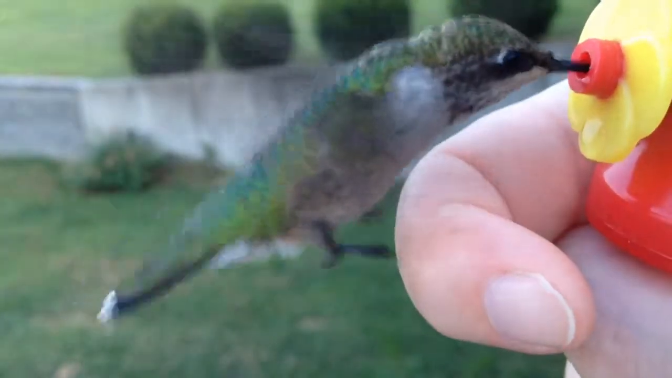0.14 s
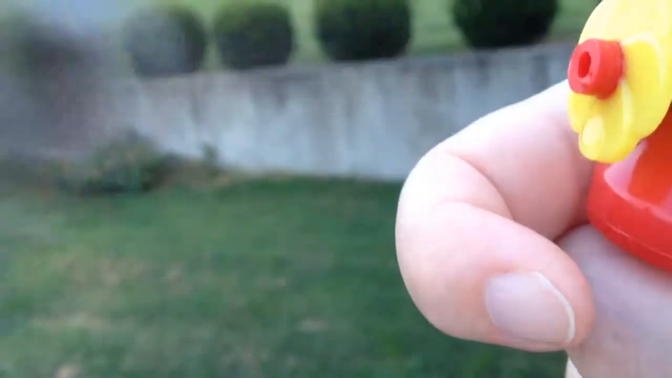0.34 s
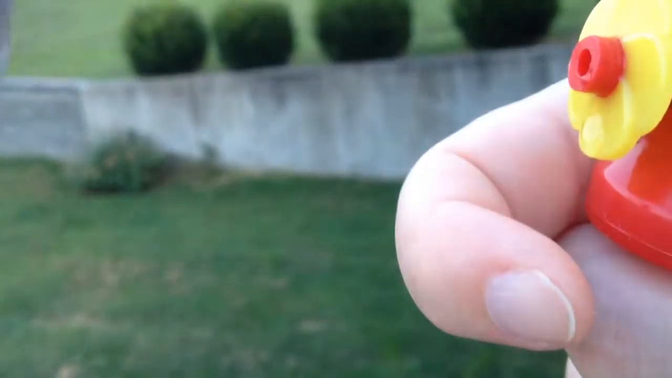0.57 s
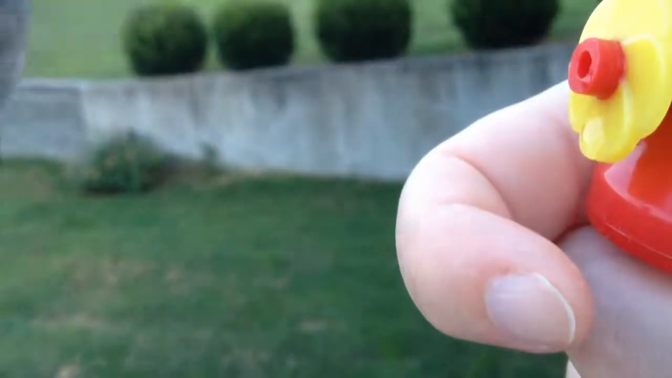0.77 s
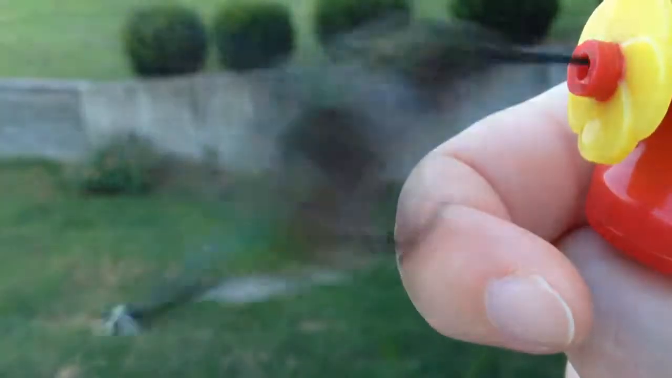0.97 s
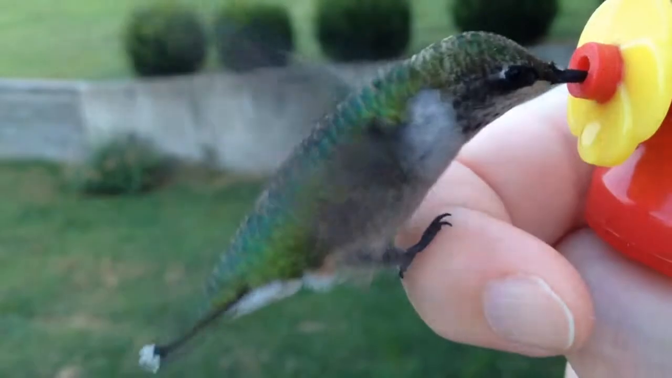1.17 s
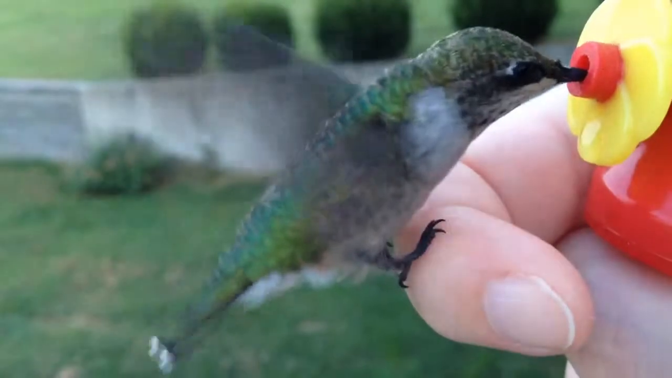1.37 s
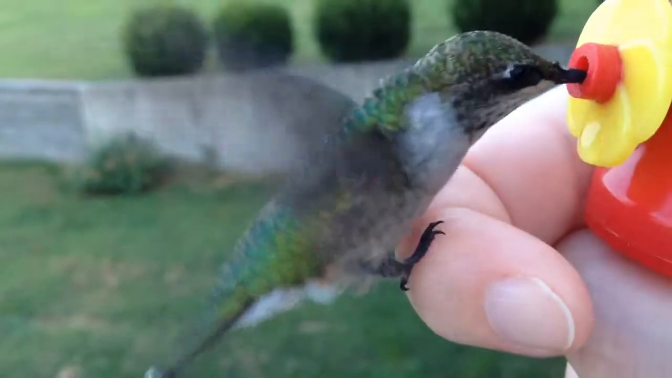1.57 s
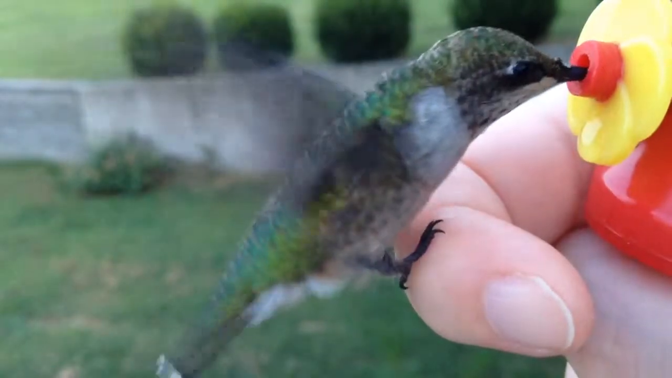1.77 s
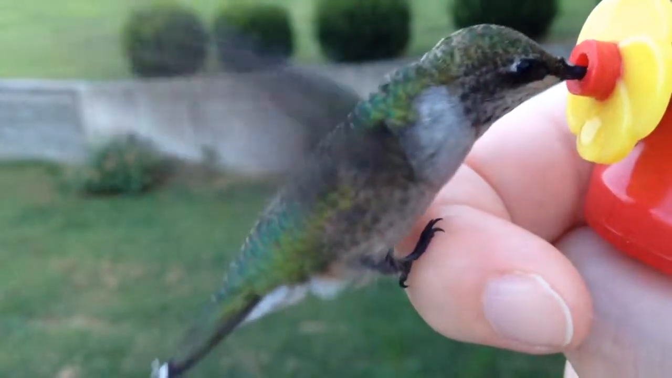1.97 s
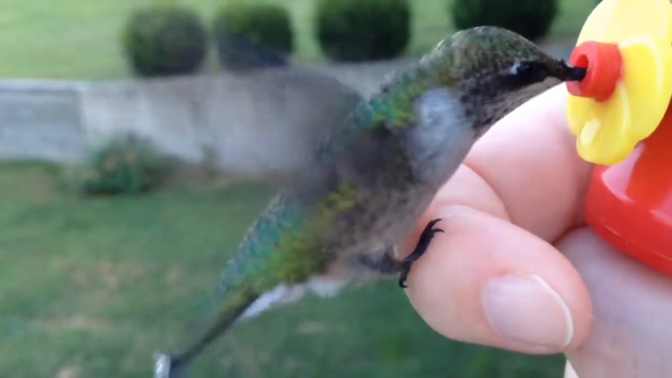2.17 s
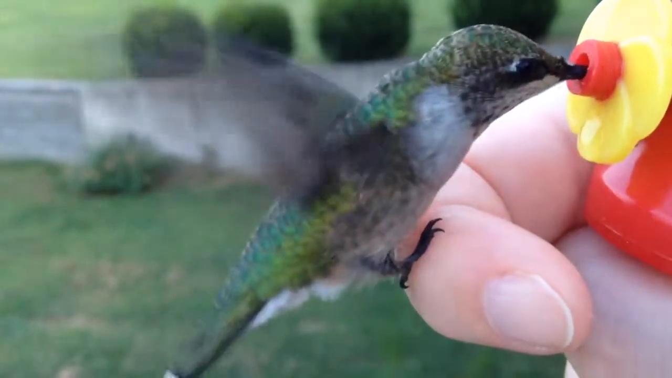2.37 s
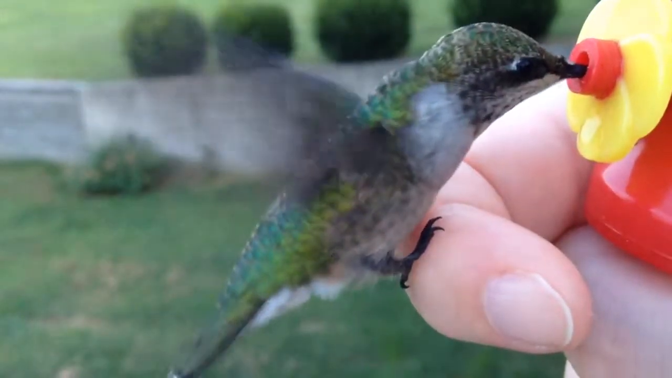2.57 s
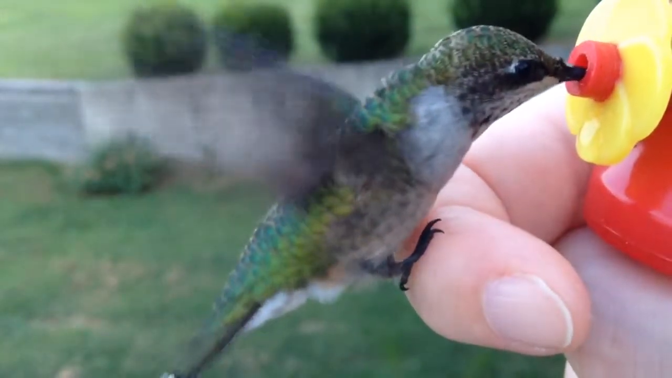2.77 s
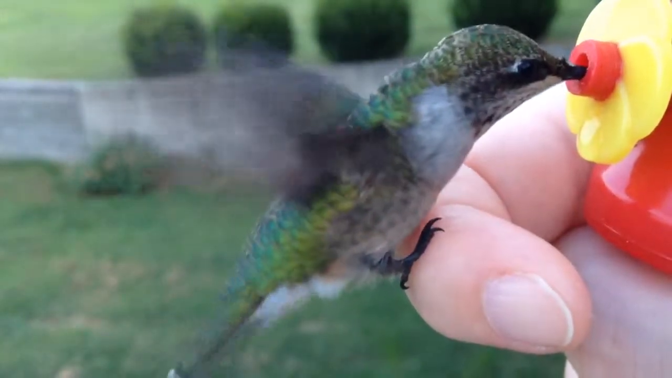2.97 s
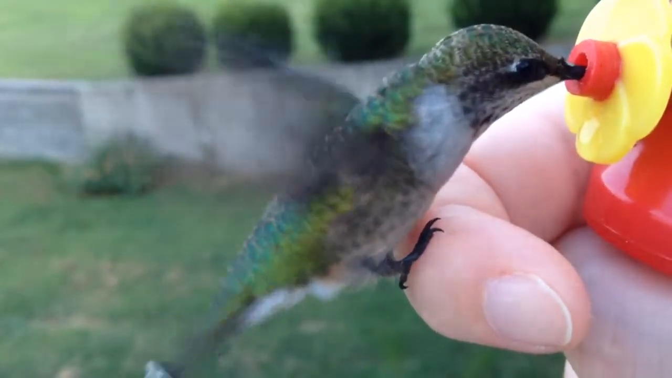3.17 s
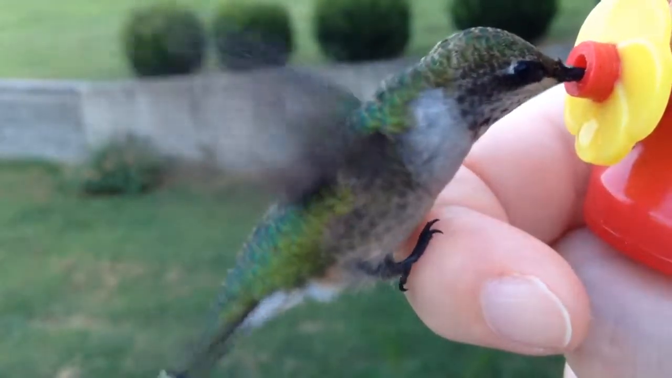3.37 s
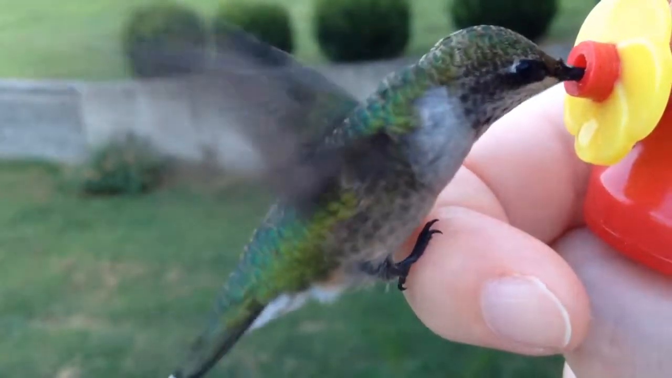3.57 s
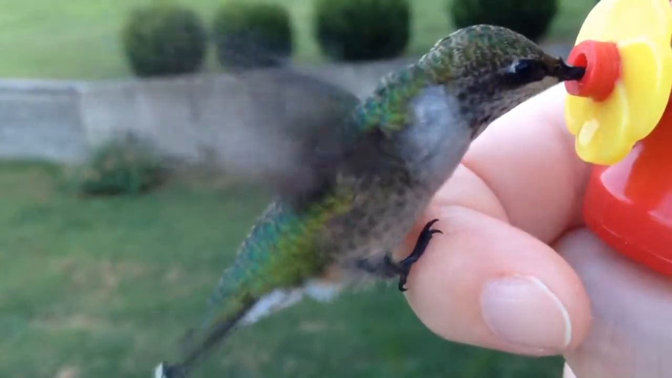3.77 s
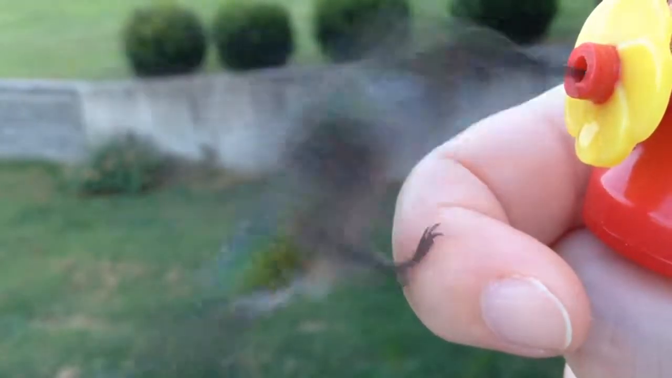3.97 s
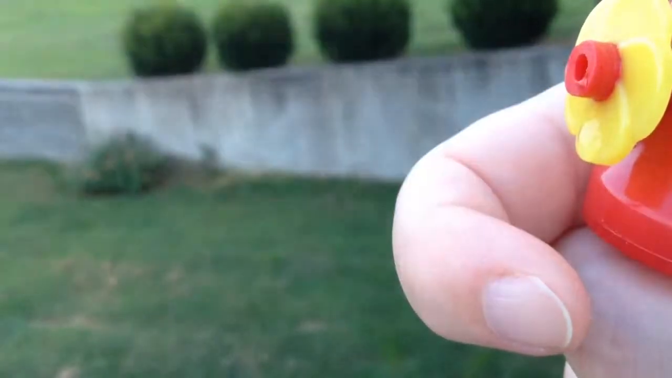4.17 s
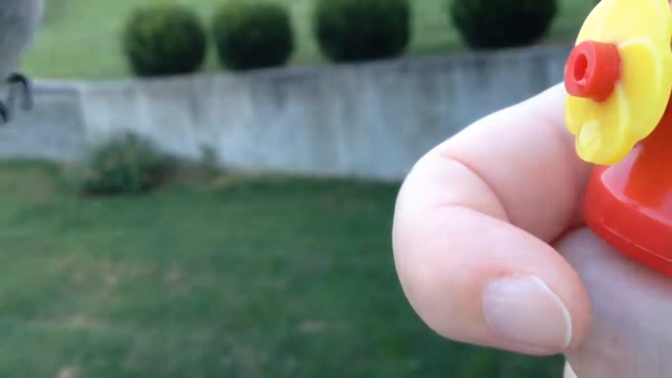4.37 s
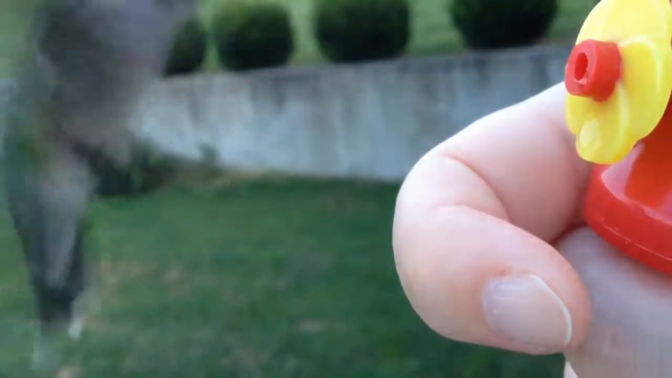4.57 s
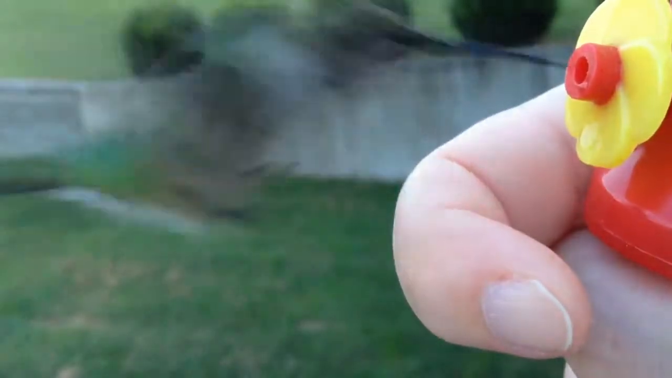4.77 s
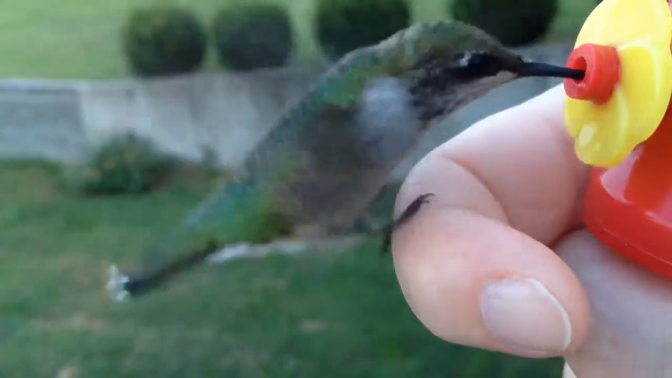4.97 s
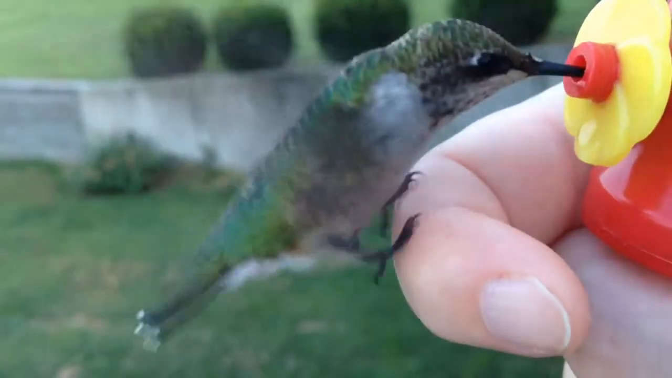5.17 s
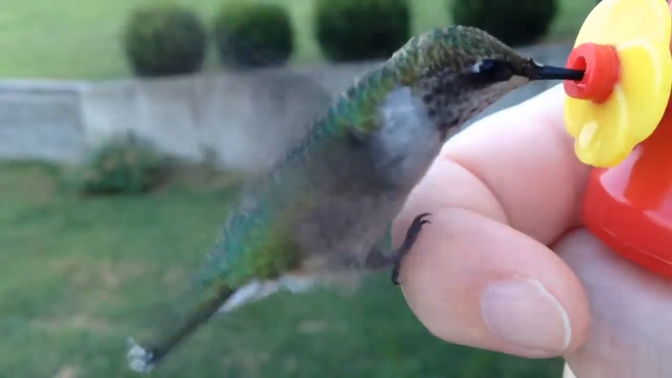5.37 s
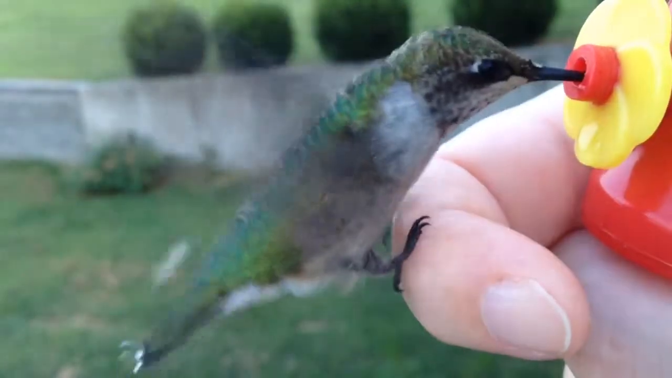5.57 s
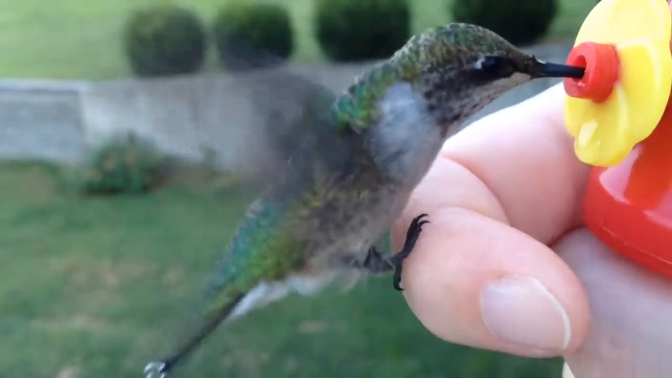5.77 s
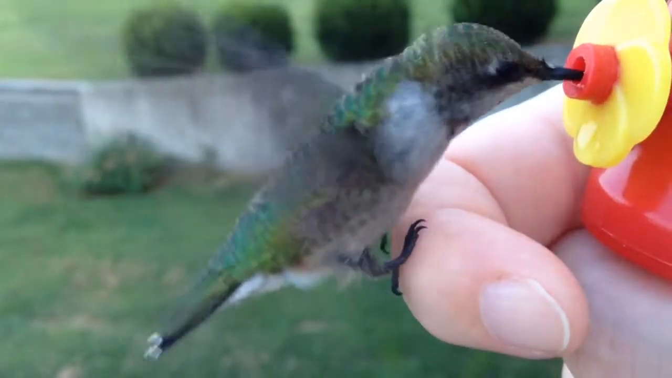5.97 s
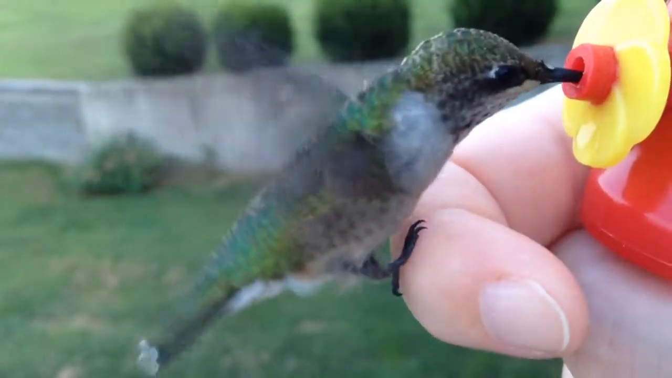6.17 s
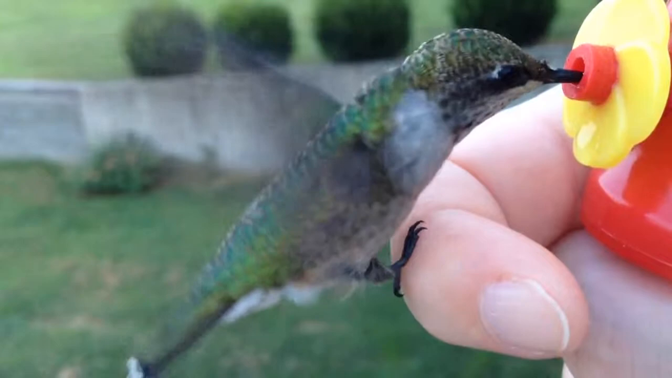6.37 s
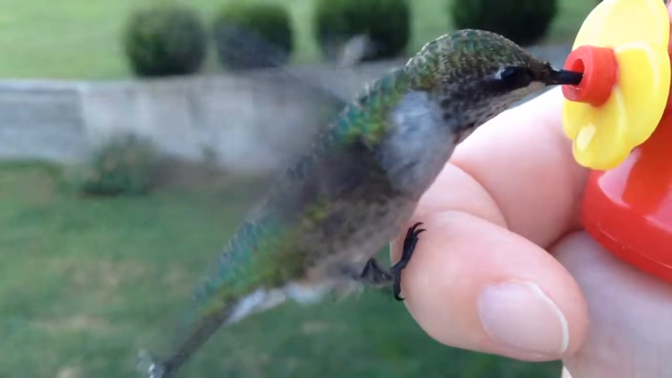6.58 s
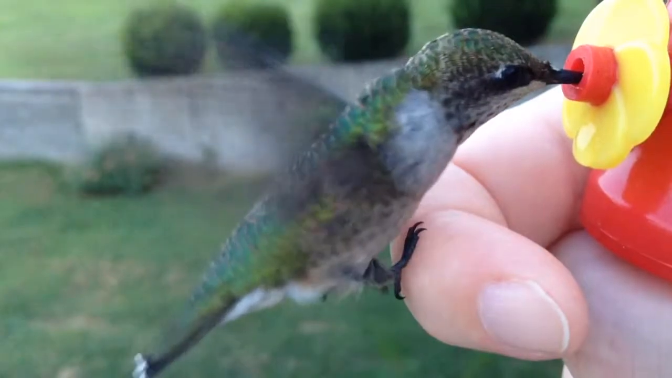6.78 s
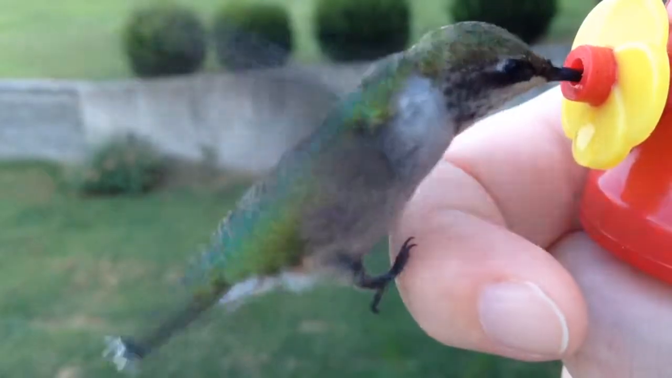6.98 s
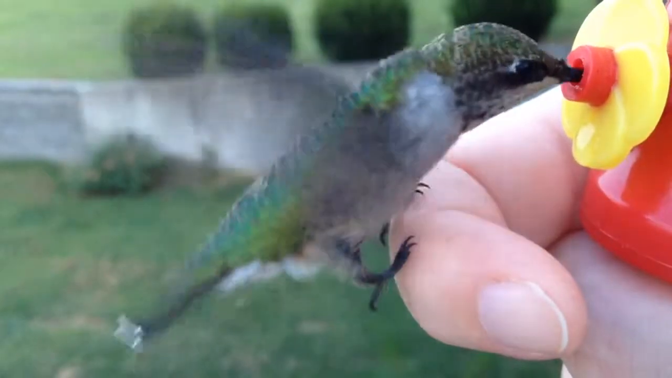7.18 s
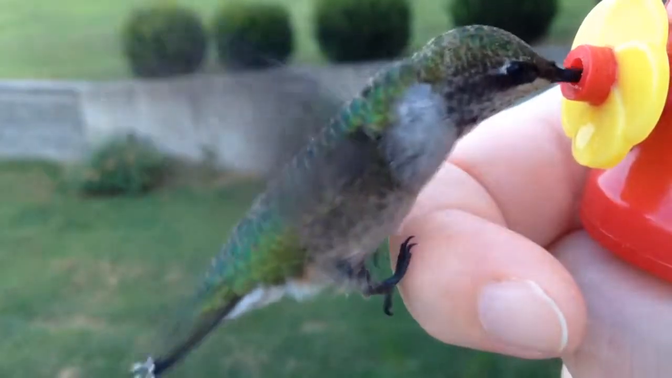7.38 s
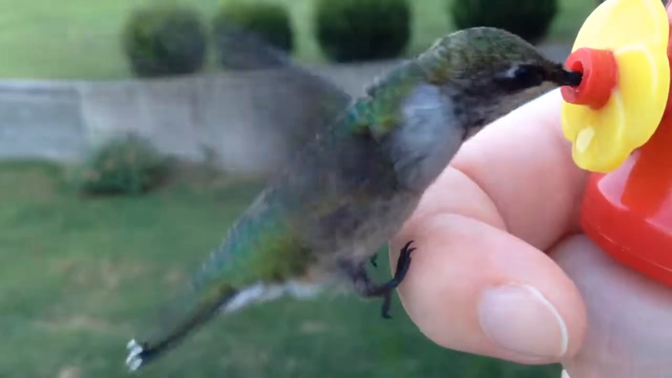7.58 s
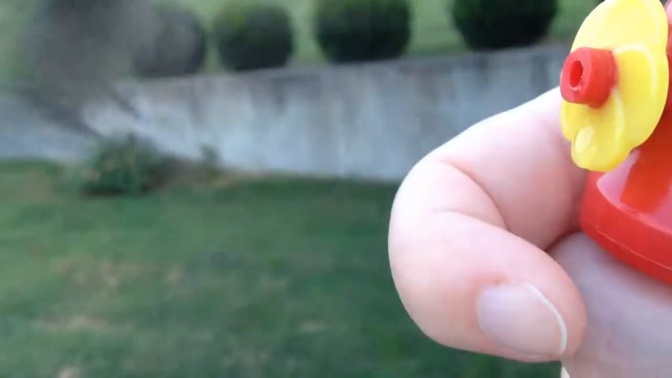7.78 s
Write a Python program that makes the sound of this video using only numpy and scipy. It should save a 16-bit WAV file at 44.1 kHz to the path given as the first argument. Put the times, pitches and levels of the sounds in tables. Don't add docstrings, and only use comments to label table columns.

```python
import sys
import numpy as np
from scipy import signal
from scipy.fft import rfft, irfft
from scipy.io import wavfile
from scipy.ndimage import uniform_filter1d

SR = 44100
rng = np.random.default_rng(int(sys.argv[2]) if len(sys.argv) > 2 else 0)


def pcm_store(signal):
    levels = np.round(np.clip(np.atleast_2d(signal), -1, 1) * 32767)
    wavfile.write(sys.argv[1], SR, levels.astype(np.int16).T)


def volts_from_db(level):
    exponent = np.asarray(level, float) / 20
    return 10 ** exponent


N = 345744
TIME_S = np.arange(N) / SR
HOVER_DB, HOVER_HZ = -66, 47.55


def rms_one(x):
    return x / np.sqrt(np.mean(x ** 2) + 1e-20)


def at_hz(points, hz):
    point_hz, point_db = np.transpose(points)
    return np.interp(np.log(hz), np.log(point_hz), point_db)


def drift(rate_hz):
    step = 40
    pole = np.exp(-2 * step * np.pi * rate_hz / SR)
    noise = rng.standard_normal(N // step + 2002)
    slow = signal.lfilter([1], [1, -2 * pole, pole * pole], noise)[2000:]
    return np.interp(np.arange(N) / step, np.arange(len(slow)), rms_one(slow - slow.mean()))


def coloured(spectrum):
    hz = np.maximum(np.fft.rfftfreq(N, 1 / SR), 1)
    low_edge = np.clip(hz / spectrum[0][0], 0, 1) ** 4
    high_edge = np.clip(hz / spectrum[-1][0], 1, None) ** 4
    gain = volts_from_db(at_hz(spectrum, hz)) * low_edge / high_edge
    return rms_one(irfft(rfft(rng.standard_normal(N)) * gain, N))


# start in seconds, hold in seconds, level in dB,
# beat rate in Hz at the start, beat rate in Hz at the end.
BURSTS = [(0, 0.17, -42.5, 58.34, 56.4), (0.192, 0.078, -43, 56.73, 58.45),
          (0.281, 0.072, -39, 59.84, 56.01), (0.383, 0.055, -42, 51.6, 49.3),
          (0.515, .26, -48, 52.43, 50.47), (0.806, .14, -48, 49.8, 48.49), (.985, 0.087, -44, 54.48, 56.48),
          (1.667, 0.037, -60, 47.86, 46.4), (3.882, 0.084, -60, 51.1, 47.56),
          (4.052, 0.058, -40, 58.56, 52.96), (4.149, 0.051, -49, 50.2, 51.64),
          (4.267, 0.11, -46.5, 54.07, 52.2), (4.393, 0.1, -46.5, 51.64, 49.53),
          (4.601, 0.12, -42.5, 57.27, 53.9), (4.718, 0.061, -45.5, 52, 50.15),
          (4.827, 0.085, -42, 54.13, 59.4), (4.997, 0.23, -45.5, 54.86, 54),
          (5.231, 0.1052, -48, 53.16, 50.16), (5.436, 0.045, -54, 48.26, 49.33),
          (5.551, 0.168, -57, 49.01, 46.7), (5.93, .07, -57.5, 47.8, 48), (6.971, .22, -52.5, 51, 52.9),
          (7.5, 0.049, -58, 49.64, 48.56), (7.744, 0.056, -42, 59.46, 53.14)]
AWAY = [
    (.36, 1),
    (4.11, 4.58),
    (7.79, 7.9),
]


def flight():
    rise_db_per_s, fall_db_per_s, ease_s = 450, 200, .025
    power = volts_from_db(2 * (HOVER_DB + 1.3 * drift(3.71)))
    weight = power ** 2
    weighted_hz = weight * (HOVER_HZ + 1.5 * drift(2.513))
    for start, hold, level_db, first_hz, last_hz in BURSTS:
        rise_db = rise_db_per_s * np.maximum(start - TIME_S, 0)
        fall_db = fall_db_per_s * np.maximum(TIME_S - start - hold, 0)
        burst = volts_from_db(2 * (level_db - np.minimum(rise_db + fall_db, 60)))
        power = np.maximum(power, burst)
        weight = weight + burst ** 2
        weighted_hz = weighted_hz + burst ** 2 * np.interp(TIME_S, [start, start + hold], [first_hz, last_hz])
    away = sum((TIME_S > a) & (TIME_S < b) for a, b in AWAY) * 1.
    curves = 10 * np.log10(power), weighted_hz / weight, away
    return [uniform_filter1d(curve, int(ease_s * SR), mode="nearest") for curve in curves]


# time in seconds, second harmonic over third in dB.
HEADING = [(0, -2), (.42, -6), (.6, -6), (.95, -7), (1.04, 3.5), (1.3, -1.5), (2.2, -12), (3.8, -8),
           (4.08, -2), (4.28, -11), (4.519, -10), (4.61, 1.5), (5.0, -1), (5.4, -0.5), (6.3, -7),
           (7.1, -3.5), (7.5, -11), (7.84, -3)]
# frequency in Hz, level in dB.
OVERTONES = [(200, 2), (270, -3.5), (330, -10.5), (420, -11), (550, -24.5), (800, -23)]


def wing_hum(effort_db, beat_hz, away, phase):
    push_db = effort_db - HOVER_DB
    turn_db = np.interp(TIME_S, *np.transpose(HEADING))
    fourth_db = np.minimum(-2.5 - .16 * push_db - 2.5 * away + 1.5 * drift(15), -1.5)
    third_db = effort_db + 10 * np.log10((1 - volts_from_db(2 * fourth_db)) / (1 + volts_from_db(2 * turn_db)))
    sharp_db = 3 - .35 * push_db + 3.5 * away
    lows = {1: effort_db - 36, 2: third_db + turn_db, 3: third_db, 4: effort_db + fourth_db}
    hum = np.zeros(N)
    for k in range(1, 13):
        level_db = lows.get(k, effort_db + sharp_db - 7 + at_hz(OVERTONES, k * beat_hz))
        slip = (.04 * k + .4 * away) * drift(4.7)
        flip = np.clip(k - 5, 0, 2) / 2 * k * 2 * np.pi * .4
        sway_db = .7 * drift(14) + (.8 + 1.2 * away) * drift(8.9)
        hum += np.sqrt(2) * volts_from_db(level_db + sway_db) * np.cos(k * phase + slip + flip - .9)
    return -hum


# frequency in Hz, density in dB per Hz.
WAKE = [(45, -46), (80, -21), (150, 0.5), (300, -0.5), (500, -9), (900, -18.5), (1600, -23), (2800, -26.5)]


def wing_wake(effort_db, phase):
    return volts_from_db(effort_db - 12) * rms_one(1 + .6 * np.cos(phase)) * coloured(WAKE)


# frequency in Hz, density in dB per Hz.
SWISH = [(600, 0), (1500, 0), (3000, -5), (6000, 7.5), (9000, -1.5), (12000, -3), (16000, -1.5)]


def wing_swish(effort_db, away, phase):
    level_db = -70.5 + .46 * np.maximum(effort_db - HOVER_DB, 0) + 3.5 * away
    strokes_db = 4 * np.cos(2 * phase) + .28 * np.cos(phase) + 1.3 * drift(30)
    return volts_from_db(level_db) * rms_one(volts_from_db(strokes_db)) * coloured(SWISH)


def wings():
    effort_db, beat_hz, away = flight()
    phase = 2 * np.pi * np.cumsum(beat_hz) / SR
    hum = wing_hum(effort_db, beat_hz, away, phase)
    return hum + wing_wake(effort_db, phase) + wing_swish(effort_db, away, phase)


def chips(rows, bend, echo_db, echo_s):
    out = np.zeros(N)
    for middle, hz, fall_hz, length, peak_db in rows:
        u = np.linspace(0, 1, int(1.07 * length * SR))
        pitch_hz = hz + .79 * fall_hz * ((1 - u) ** bend - .48)
        phase = 2 * np.pi * np.cumsum(pitch_hz) / SR
        sweep = np.sin(phase) + volts_from_db(-13.5) * (np.sin(3 * phase) + np.sin(4 * phase))
        swell = np.abs(np.sin(np.pi * u ** .5)) ** .43
        start = int((middle - .43 * length) * SR)
        out[start:start + len(u)] += volts_from_db(peak_db) * swell * sweep
    echoes = np.zeros(int(echo_s * SR) + 1)
    arrivals = (rng.uniform(echo_s / 8, echo_s, 12) * SR).astype(int)
    echoes[arrivals] = volts_from_db(echo_db) * rng.standard_normal(12)
    return out + signal.fftconvolve(out, echoes)[:N]


# middle in seconds, middle pitch in Hz, fall in Hz, peak in dB.
NEAR_CHIPS = [(.046, 1980, 400, -56.5), (.27, 2110, 750, -49.5), (.678, 2060, 543, -52),
              (0.781, 2100, 543, -56), (0.812, 1946, 750, -50), (1.43, 1870, 1110, -54),
              (2.02, 1800, 979, -57.5), (2.279, 2240, 810, -55.5), (6.204, 1840, 896.3, -59.5),
              (6.909, 2052, 901.5, -49.5), (7.56, 1607, 797.4, -64)]
# middle in seconds, middle pitch in Hz, peak in dB.
FAR_CHIPS = [(3.766, 1286, -74), (4.689, 1803, -62), (4.775, 1805, -59), (4.862, 1690, -62),
             (5.237, 1644, -62), (5.546, 1670, -72), (5.725, 1030, -61), (5.736, 1820, -61),
             (5.771, 1428, -64), (5.858, 1630, -66), (6.228, 1717, -61), (6.322, 1700, -65),
             (6.337, 1374, -64), (6.421, 1700, -67), (6.939, 1526, -64), (7.015, 1735, -64),
             (7.13, 1500, -67), (7.216, 1650, -60), (7.4, 1600, -71), (7.621, 1696, -63),
             (7.634, 1336, -62), (7.637, 2720, -66), (7.713, 1548, -61), (7.789, 1799, -61)]
# middle in seconds, pitch in Hz, fall in Hz, length in seconds, peak in dB.
GURGLE = (5.417, 641, 60, .02, -56.5)


def calls():
    shortest_s, fall_hz_per_s = .006, 66000
    far_fall = .29
    near = [(s, hz, fall, shortest_s + fall / fall_hz_per_s, db) for s, hz, fall, db in NEAR_CHIPS]
    far = [(s, hz, far_fall * hz, shortest_s + far_fall * hz / fall_hz_per_s, db) for s, hz, db in FAR_CHIPS]
    near_sound = chips(near + [GURGLE], bend=1.25, echo_db=-28, echo_s=.06)
    return near_sound + chips(far, bend=1.5, echo_db=-15, echo_s=.018)


# time in seconds, peak in dB.
TICKS = [
    (3.761, -39),
    (5.74, -50),
    (7.634, -52),
]


def ticks():
    out = np.zeros(N)
    t = np.arange(800) / SR
    for s, peak_db in TICKS:
        start = int(s * SR)
        out[start:start + len(t)] = volts_from_db(peak_db) * np.exp(-t / .0012) * rng.standard_normal(len(t))
    return signal.sosfilt(signal.butter(2, [600, 3300], "band", fs=SR, output="sos"), out)


# frequency in Hz, density in dB per Hz.
CHORUS = [(1350, -34), (2300, -29), (2720, -21.5), (3350, -6), (4000, -1), (4390, -2), (4840, -0.5),
          (5510, -2.5), (6380, -2.5), (7870, -13), (10000, -25), (13000, -67), (22000, -120)]
# frequency in Hz, width in Hz, level in dB.
SINGERS = [(4020, 35, -70), (4180, 53, -70.5), (4533, 35, -68.5), (4814, 49, -68.5)]


def insects():
    throb_s, throb_crest_s = .411, 1.45
    throb = np.cos(2 * np.pi * (TIME_S - throb_crest_s) / throb_s)
    slow_db = throb + 1.5 * np.exp(-TIME_S / .88)
    spectrum, hz = rfft(coloured(CHORUS)), np.fft.rfftfreq(N, 1 / SR)
    centres = np.geomspace(2400, 10000, 9)
    out = np.zeros(N)
    for k, centre in enumerate(centres):
        band = irfft(spectrum * np.interp(hz, centres, np.arange(9) == k), N)
        rate_hz = np.interp(centre, [5000, 7000], [66, 59]) + 1.79 * drift(1.97)
        pulse_db = 1.8 * np.cos(2 * np.pi * np.cumsum(rate_hz) / SR)
        high = np.interp(centre, [5000, 7000], [.2, 1])
        out += band * volts_from_db(pulse_db + .68 * drift(13) + high * slow_db)
    out = volts_from_db(-51.5 + 1.5 * np.exp(-TIME_S / 3.5)) * rms_one(out)
    for hz, width_hz, level_db in SINGERS:
        peak = [(hz * .9, -60), (hz - width_hz, -20), (hz, 0), (hz + width_hz, -20), (hz * 1.1, -60)]
        out += volts_from_db(level_db) * coloured(peak)
    return out


# frequency in Hz, density in dB per Hz.
GARDEN = [(25, -31), (60, -22), (100, -6), (200, 6), (400, -4), (800, -17), (1500, -25), (2500, -22.5),
          (6000, -38), (10000, -22.5), (15000, -20.5)]


def garden():
    return volts_from_db(-60.5 + .5 * drift(1.82)) * coloured(GARDEN)


# time in seconds, level in dB.
TRAFFIC = [
    (0, -74),
    (1.899, -72.5),
    (3.9, -70),
    (4.4, -71),
    (7.84, -65.5),
]
# frequency in Hz, density in dB per Hz.
ROAD = [(350, -14.5), (600, 5), (1000, 3), (1500, -1), (2300, -11.5)]


def traffic():
    level_db = np.interp(TIME_S, *np.transpose(TRAFFIC))
    return volts_from_db(level_db - 4.5 + 1.74 * drift(10.5)) * coloured(ROAD)


def scene():
    bird = wings() + calls() + ticks()
    return np.tile(bird + insects() + garden() + traffic(), (2, 1))


def band_limit(x):
    return signal.sosfilt(signal.butter(12, 15330, fs=SR, output="sos"), x)


def record(dry):
    hz, _, cells = signal.stft(dry[0], SR, nperseg=2048)
    power = uniform_filter1d(np.abs(cells) ** 2, size=5, axis=0)
    power = uniform_filter1d(power, size=3, axis=1)
    usual = np.median(power, axis=1, keepdims=True)
    lost = (power < volts_from_db(2 * -3.4) * usual) & (hz[:, None] > 7500)
    kept = signal.istft(cells * ~lost, SR, nperseg=2048)[1][:N]
    return band_limit(np.tile(kept, (2, 1)))


dry = scene()
out = record(dry)
pcm_store(out)
```